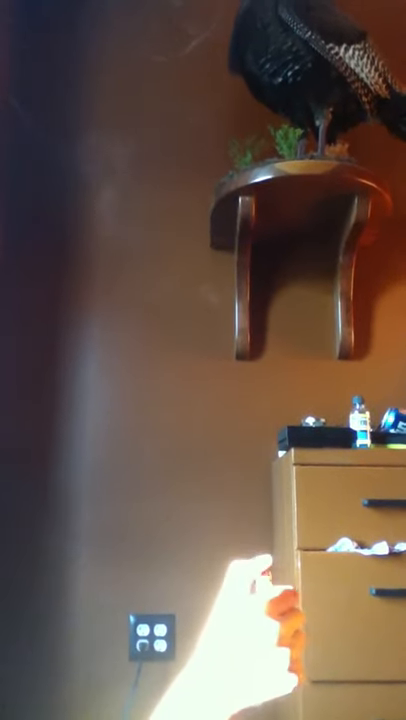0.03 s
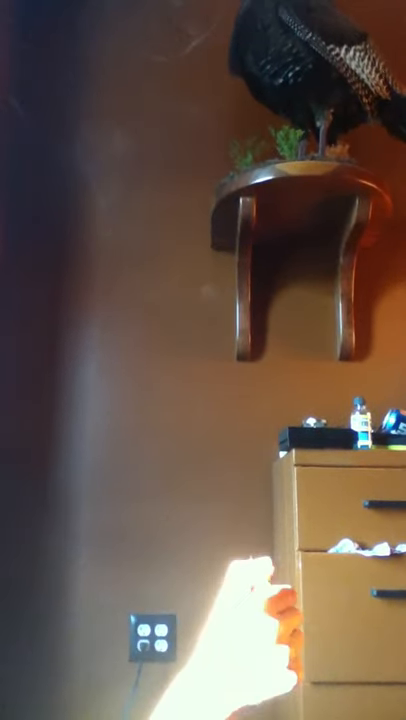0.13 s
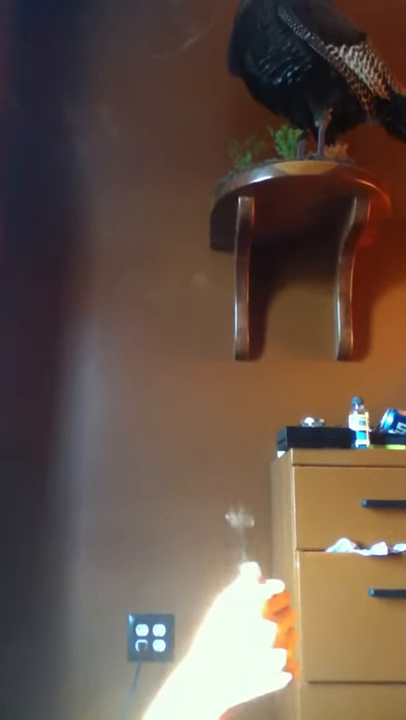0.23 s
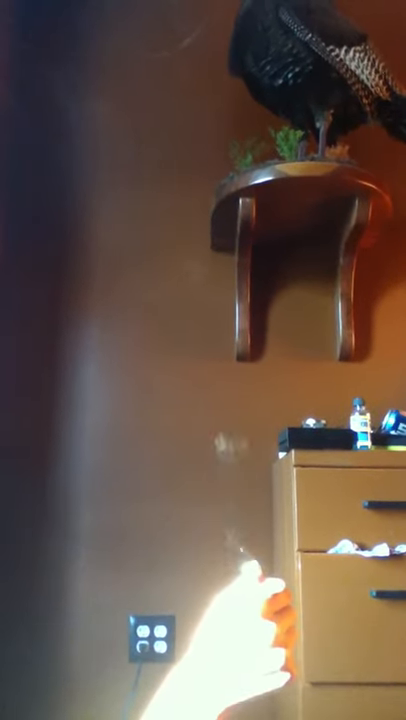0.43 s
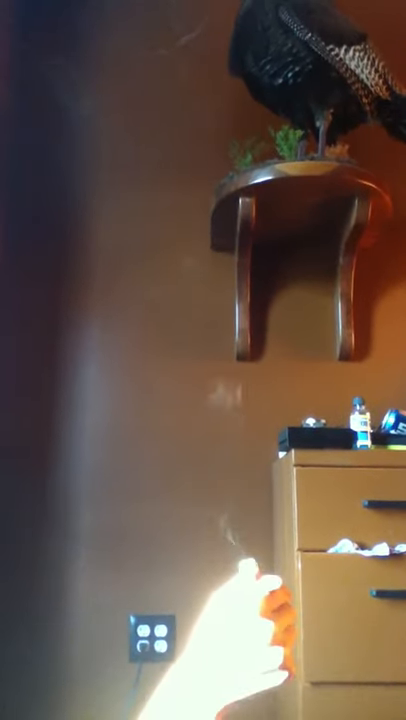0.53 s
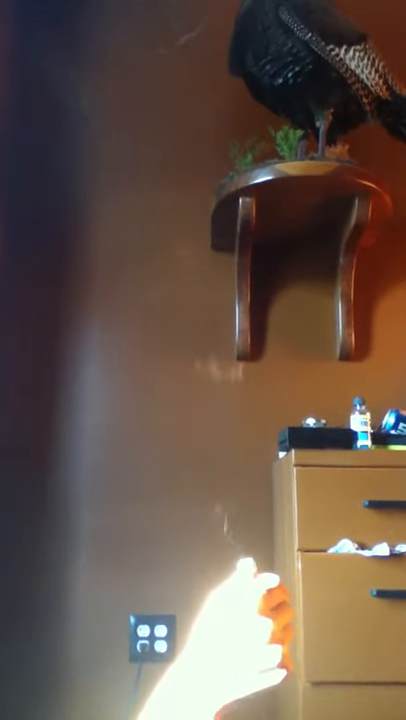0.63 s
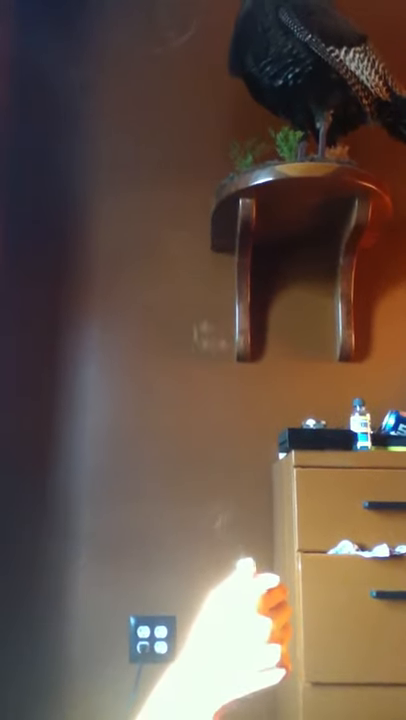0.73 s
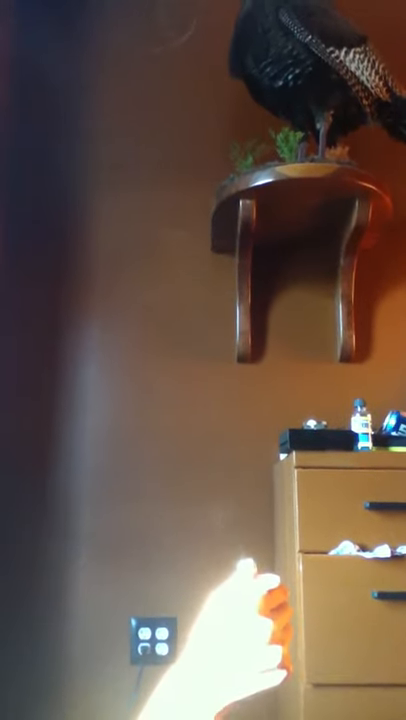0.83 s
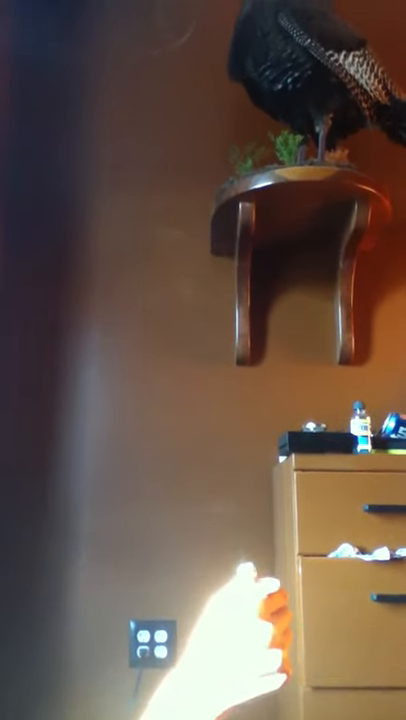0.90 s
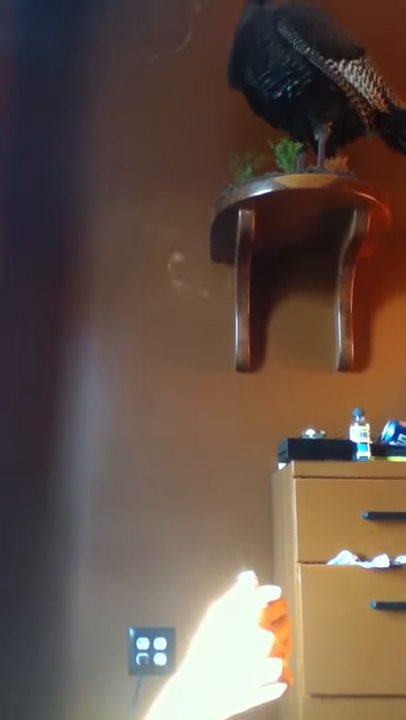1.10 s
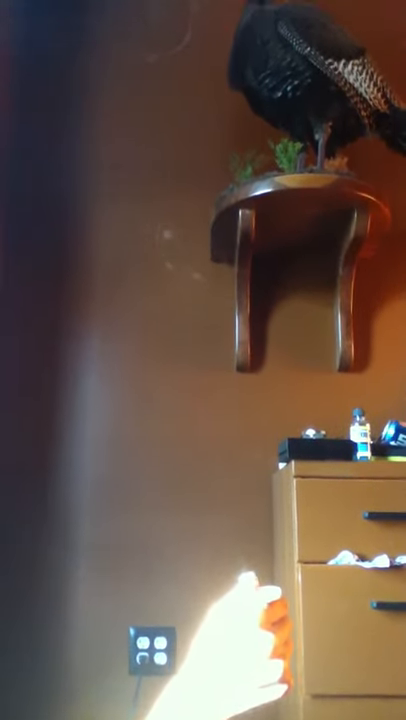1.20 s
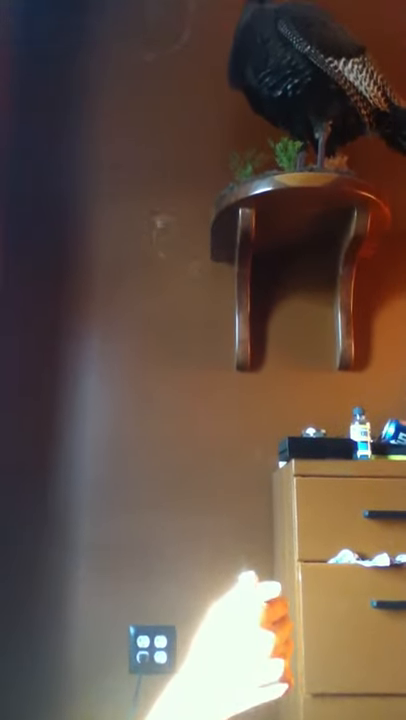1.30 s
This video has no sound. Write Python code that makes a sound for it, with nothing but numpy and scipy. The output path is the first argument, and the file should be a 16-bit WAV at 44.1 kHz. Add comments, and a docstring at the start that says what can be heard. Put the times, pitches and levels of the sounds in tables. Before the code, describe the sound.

A lighter is flicked once in a small, quiet room: the spark wheel rasps briefly, then the gas lever snaps with a sharp metallic click. A short echo fades into faint hiss and a soft hand rustle.

```python
"""A lighter, flicked once in a small, quiet room.
The spark wheel rasps over the flint and slips free; the thumb snaps the gas lever onto its stop.
Both ring the metal head. Nearby walls and furniture echo, and the room rings briefly.
Underneath: a low murmur of air, faint hiss and two soft rustles of the hand."""
import sys
import numpy as np
from scipy import signal
from scipy.fft import rfft, irfft
from scipy.io import wavfile
from scipy.ndimage import uniform_filter1d

SR = 44100
rng = np.random.default_rng(int(sys.argv[2]) if len(sys.argv) > 2 else 0)


def transcribe(signal):
    """Save signal, clipped to [-1, 1], as a 16-bit WAV file at the path in sys.argv[1]."""
    frames = np.atleast_2d(signal).T
    limited = np.clip(frames, -1, 1)
    pcm = np.round(limited * 32767).astype(np.int16)
    wavfile.write(sys.argv[1], SR, pcm)


N = 59535


def amp(db):
    """Decibels to gain."""
    return 10 ** (np.asarray(db) / 20)


def unit_rms(x):
    """Scale to rms 1."""
    return x / np.sqrt(np.mean(x ** 2) + 1e-20)


def unit_energy(x):
    """Scale to energy 1."""
    return x / np.sqrt(np.sum(x ** 2) + 1e-20)


def lookup(points, hz):
    """Interpolate a table over log frequency."""
    points_hz, values = np.transpose(points)
    return np.interp(np.log(hz + 1), np.log(points_hz + 1), values)


def add(mix, start_s, sound):
    """Mix a sound in at start_s."""
    part = mix[max(round(start_s * SR), 0):][:len(sound)]
    part += sound[:len(part)]


def through(x, response):
    """Convolve, cut to N samples."""
    return signal.fftconvolve(x, response)[:N]


def colour(spectrum, size=2048):
    """Minimum-phase impulse response: given spectrum, energy 1."""
    log_gain = np.log(amp(lookup(spectrum, abs(np.fft.fftfreq(size, 1 / SR)))))
    transfer = np.exp(np.conj(signal.hilbert(log_gain)))
    return unit_energy(np.fft.ifft(transfer).real)


def burst(decay_s, size=512, passes=12):
    """Dying noise burst: near-flat spectrum, energy 1."""
    fade = np.exp(-np.arange(size) / SR / max(decay_s, 1 / SR))
    x = rng.standard_normal(size) * fade
    for _ in range(passes):  # flatten the spectrum, reimpose the fade
        bins = rfft(x)
        x = irfft(bins / (abs(bins) + 1e-12))
        x = x * fade / np.sqrt(abs(uniform_filter1d(x ** 2, size=24)) + 1e-12)
    return unit_energy(x)


def noise(spectrum):
    """Steady noise: given spectrum, rms 1."""
    gain = amp(lookup(spectrum, np.fft.rfftfreq(N, 1 / SR)))
    return unit_rms(irfft(rfft(rng.standard_normal(N)) * gain, N))


def room_air(murmur_db=-58, hiss_db=-61.5):
    """Steady low murmur of air, plus faint hiss."""
    # Noise spectra. Each row: frequency in Hz, relative density in dB.
    murmur = [(12, -43), (20, -20), (80, -9), (107, -4.5), (135, -6.5), (163, -1), (259, 0), (297, -6),
              (454, -5), (680, -10.5), (734, -9), (1020, -14), (2000, -18), (2600, -51), (4400, -120)]
    hiss = [(1180, -28), (2000, -7), (2110, -0.5), (2390, -2.5), (2620, -2.5), (4040, -3.5), (16400, -7.5),
            (17200, -14)]
    return amp(murmur_db) * noise(murmur) + amp(hiss_db) * noise(hiss)


def hand_rustles():
    """The hand rustles: two soft swells of dull noise."""
    # Swells. Each row: centre in seconds, 1/e half-width in seconds, peak level in dB.
    swells = [(0.055, 0.011, -56.5), (1.063, 0.027, -57.5)]
    # Rustle spectrum. Each row: frequency in Hz, relative density in dB.
    spectrum = [(60, -20), (350, -0.5), (750, -3), (1300, -15), (2500, -22), (8000, -42)]
    t = np.arange(N) / SR
    envelope = sum(amp(db) * np.exp(-((t - at_s) / half_s) ** 2) for at_s, half_s, db in swells)
    return envelope * noise(spectrum)


def spark_wheel(teeth_per_s=1300, tooth_spread_db=2.5, scrape_db=-31, ring_db=-12):
    """Teeth tick unevenly over the flint, grit between them; two chips crack off."""
    # Wheel-on-flint spectrum. Each row: frequency in Hz, relative density in dB.
    spectrum = [(100, -17.5), (900, -22), (1900, -15), (2750, -3.5), (3400, -6.5), (4300, -6), (5700, -3.5),
                (7500, -11), (8900, 0), (10000, -3), (11500, -6.5), (13500, -22.5), (16000, -16),
                (17000, -36)]
    # Flint chips. Each row: start in seconds, relative level in dB, decay in seconds.
    chips = [(0.2538, -9.5, .0010), (.2548, -14, 0.00047)]
    touch_s, full_speed_s, release_s = 0.2384, 0.25, 0.253
    touch_db, coast_db_per_s = -20, -1300
    t = np.arange(N) / SR
    wobble = unit_rms(uniform_filter1d(rng.standard_normal(N), size=40))
    teeth_passed = np.cumsum(teeth_per_s * (1 + 0.25 * wobble)) / SR
    ticks = np.diff(np.floor(teeth_passed), prepend=0)
    ticks *= amp(tooth_spread_db * rng.standard_normal(N)) * rng.choice([-1, 1], N)
    grit = rng.standard_normal(N)
    stroke_db = np.interp(t, [touch_s, full_speed_s], [touch_db, 0])
    stroke_db += coast_db_per_s * np.maximum(t - release_s, 0)
    force = unit_rms(unit_rms(ticks) + grit) * amp(scrape_db + stroke_db) * (t > touch_s)
    for start_s, db, decay_s in chips:
        add(force, start_s, amp(db) * burst(decay_s))
    return through(force, colour(spectrum)) + amp(ring_db) * through(force, metal_head())


def metal_head():
    """Tap response of the lighter's head: damped modes."""
    # Modes. Each row: frequency in Hz, relative level in dB, T60 in seconds.
    modes = [(2590, -12.5, 0.015), (2820, -16, 0.015), (5960, -5, .010), (6136, 4, 0.012),
             (6390, -1.5, .011), (7350, -13, 0.014), (13800, -15, .008)]
    t = np.arange(SR // 20) / SR
    ring = sum(amp(db - 60 * t / t60_s) * np.cos(2 * np.pi * hz * t) for hz, db, t60_s in modes)
    return unit_energy(ring)


def gas_lever(crack_db=-3, ring_db=-5.5):
    """The lever slides, cracks onto its stop, bounces once and rings the head."""
    # Slide, hit, bounce. Each row: start in seconds, relative level in dB, decay in seconds.
    contacts = [(0.2881, -15, 0.0024), (.2897, -2, .0009), (0.2918, -11, 0.00092)]
    # Crack spectrum. Each row: frequency in Hz, relative density in dB.
    spectrum = [(100, -24), (1100, -31.5), (1900, -20), (2600, -3.5), (3200, -8.5), (3900, -2),
                (5000, -8.5), (6050, -0.5), (7000, -3.5), (7600, -2.5), (9300, -3), (11500, -8),
                (13000, -13.5), (14000, -3.5), (15000, -21), (17000, -42)]
    force = np.zeros(N)
    for start_s, db, decay_s in contacts:
        add(force, start_s, amp(db) * burst(decay_s))
    crack = amp(crack_db) * through(force, colour(spectrum))
    return crack + amp(ring_db) * through(force, metal_head())


def early_echoes(scatter_s=0.0004):
    """Early response: each nearby surface returns a slightly scattered copy."""
    # Wall and furniture echoes. Each row: delay in seconds, relative level in dB.
    echoes = [(.0077, -1), (.0085, -10.5), (0.0124, -1.5), (.0130, -3.5), (.0147, -3), (0.0164, -3.5),
              (0.0194, -9.5), (.029, -11.5)]
    response = np.zeros(SR // 10)
    for delay_s, db in echoes:
        add(response, delay_s, amp(db) * burst(scatter_s))
    return response


def room_tail(delay_s=0.0027, build_s=0.0057):
    """Late response: dense reflections build up, each band dies at its own rate."""
    # Room decay. Each row: frequency in Hz, T60 in seconds.
    decay_times = [(200, 0.35), (1300, 0.47), (2700, 0.34), (4500, 0.39), (6100, 0.35), (7200, .34),
                   (9500, 0.36), (14000, 0.23)]
    hz, frame_s, bins = signal.stft(rng.standard_normal(SR), SR, nperseg=256)
    decay = amp(-60 * frame_s / lookup(decay_times, hz)[:, None])
    _, tail = signal.istft(bins * decay, SR, nperseg=256)
    t = np.arange(len(tail)) / SR
    return unit_energy(tail * np.clip((t - delay_s) / build_s, 0, 1))


def scene():
    """Rasp and snap, direct and reflected, over air and rustles. Mono."""
    # Surface reflection spectrum. Each row: frequency in Hz, relative gain in dB.
    surfaces = [(100, -0.5), (2500, -0.5), (6500, 1), (9000, -3.5), (11500, -7), (16000, -4)]
    rasp_echo_db, snap_echo_db = -12, -6.5
    rasp_tail_db, snap_tail_db = -5.5, -1.57
    rasp, snap = spark_wheel(), gas_lever()
    early = through(amp(rasp_echo_db) * rasp + amp(snap_echo_db) * snap, early_echoes())
    late = through(amp(rasp_tail_db) * rasp + amp(snap_tail_db) * snap, room_tail())
    reflected = through(early + late, colour(surfaces))
    return (rasp + snap + reflected + room_air() + hand_rustles())[None]


def record(dry):
    """Steep linear-phase low-pass."""
    cutoff_hz = 17250
    lowpass = signal.firwin(511, cutoff_hz, window=("kaiser", 9), fs=SR)
    return signal.oaconvolve(dry, lowpass[None], "same")


dry = scene()
out = record(dry)
transcribe(out)
```